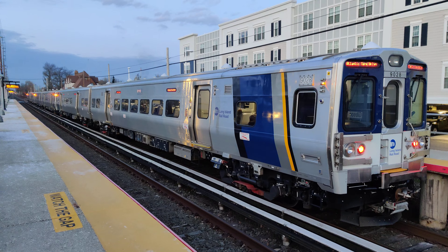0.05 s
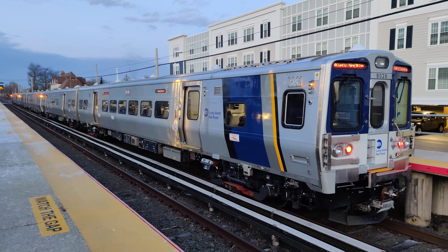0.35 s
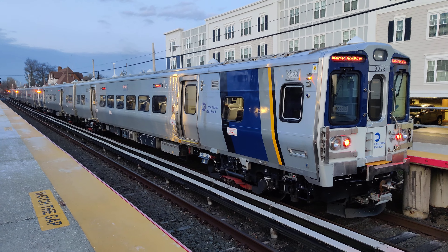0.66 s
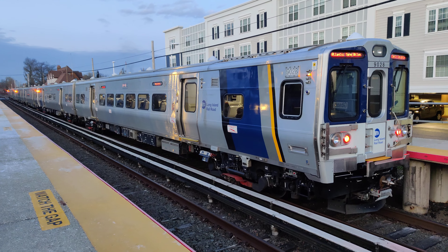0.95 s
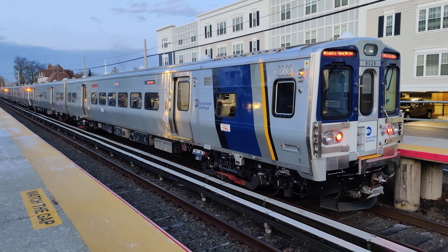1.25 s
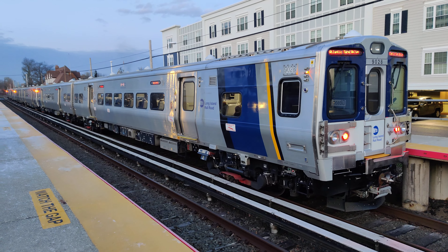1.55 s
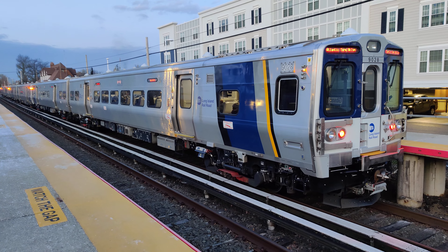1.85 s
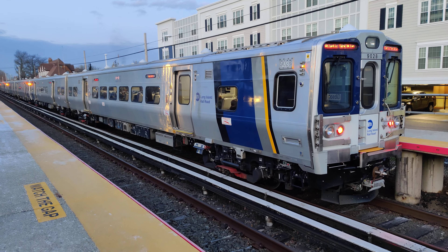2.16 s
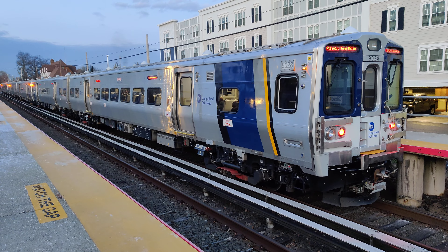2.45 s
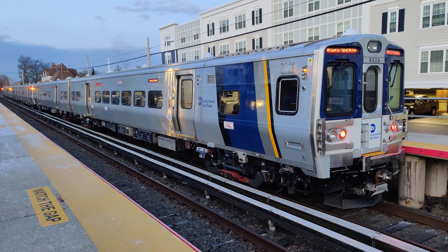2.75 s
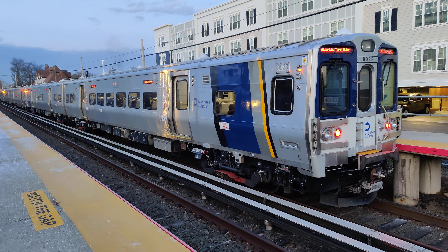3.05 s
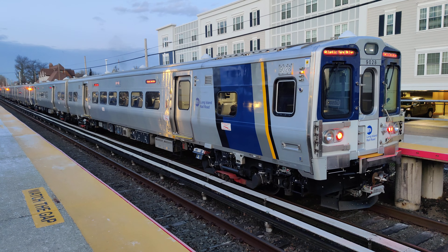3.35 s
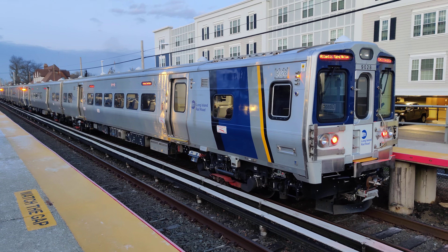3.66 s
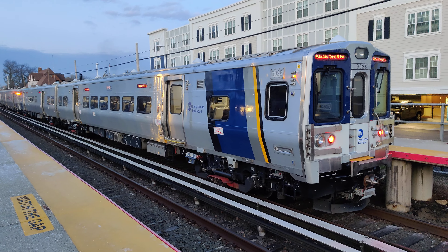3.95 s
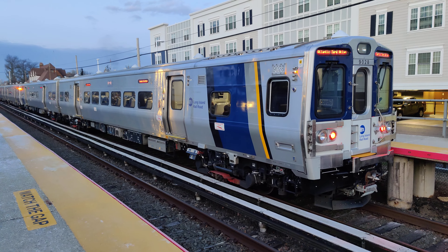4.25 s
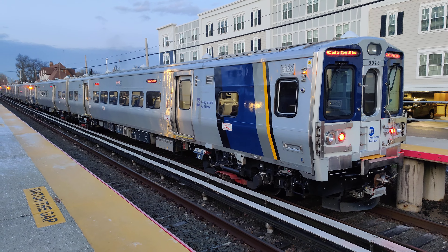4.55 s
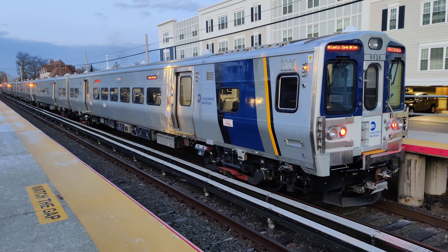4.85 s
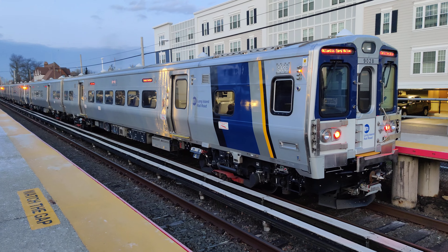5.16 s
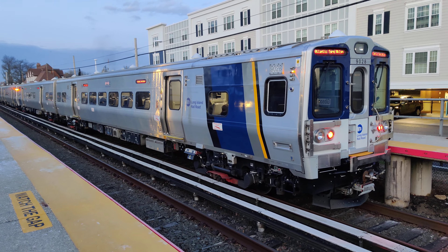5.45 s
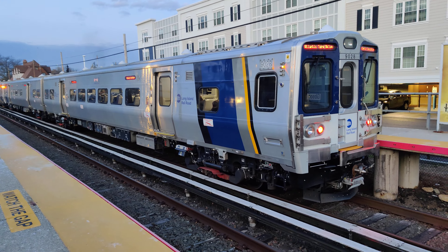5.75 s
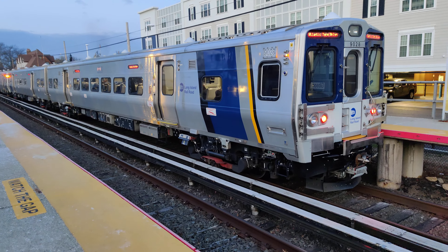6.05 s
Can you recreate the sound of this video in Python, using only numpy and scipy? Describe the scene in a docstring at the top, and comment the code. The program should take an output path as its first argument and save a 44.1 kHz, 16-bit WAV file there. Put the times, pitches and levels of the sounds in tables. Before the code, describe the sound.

Throbbing blower hum, airy hiss and thin high tones from a standing electric train, with close handling rubs and ticks near the end.

```python
"""An outdoor platform, where an electric commuter train idles: its blowers rumble and throb, air hisses,
the converters whistle faintly, and there is one dry click and a thin squeal. Further off, a faint motor
rises and falls. Late on, the hand that holds the camera shifts its grip: skin rubs over the case,
which ticks and knocks. Each microphone port adds its own resonances."""
import sys
import numpy as np
from scipy.fft import rfft, irfft, next_fast_len
from scipy.io import wavfile
from scipy.ndimage import map_coordinates

SR = 44100
rng = np.random.default_rng(int(sys.argv[2]) if len(sys.argv) > 2 else 0)


def dump(signal):
    """Clip the signal to [-1, 1] and save it as 16-bit WAV at the path in sys.argv[1]."""
    limited = np.clip(np.atleast_2d(signal).T, -1, 1)
    pcm = np.round(limited * 32767).astype(np.int16)
    wavfile.write(sys.argv[1], SR, pcm)


N = 269451


def amp(db):
    """Decibels to gain."""
    return 10 ** (np.asarray(db) / 20)


def unit(x):
    """Scale to rms 1."""
    return x / np.sqrt(np.mean(x ** 2) + 1e-20)


def along(points, hz):
    """Read (freq_hz, value) points on a log frequency axis."""
    freqs, values = np.transpose(points)
    return np.interp(np.log(hz + 1), np.log(freqs + 1), values)


def curves(rows):
    """Automation lanes: one value per sample for each column after time_s."""
    times, *columns = np.transpose(rows)
    return [np.interp(np.arange(N) / SR, times, column) for column in columns]


def wobble(rate):
    """A smooth random curve, rate knots a second."""
    return map_coordinates(rng.standard_normal(int(N * rate / SR) + 4), [np.arange(N) * rate / SR])


def filtered(x, response):
    """Filter x by a complex response of frequency."""
    size = next_fast_len(N + SR // 4)
    return irfft(rfft(x, size) * response(np.fft.rfftfreq(size, 1 / SR)), size)[..., :N]


def panned(pan_db):
    """Left and right gains for a level difference; positive is left."""
    return amp(np.array([[.5], [-.5]]) * pan_db)


def add(track, start_s, sound):
    """Mix a short sound into a track."""
    part = track[..., round(start_s * SR):][..., :sound.shape[-1]]
    part += sound[..., :part.shape[-1]]


def blend(pair, correlation):
    """Set the stereo width of two unrelated noises from (freq_hz, correlation) points."""
    angle = lambda hz: np.arccos(np.clip(along(correlation, hz), -1, 1)) / 2
    mid, side = filtered(pair, lambda hz: np.array([np.cos(angle(hz)), np.sin(angle(hz))]))
    return np.array([mid + side, mid - side])


def left_first(pair, lead):
    """Let the sound reach the left port a little earlier, by (freq_hz, lead_rad) points."""
    return filtered(pair, lambda hz: np.exp(1j * np.array([[.5], [-.5]]) * along(lead, hz)))


def port(x, resonances):
    """The resonant peaks and dips on the way into one microphone port, as a chain of bell filters."""
    def bell(hz, centre_hz, width_hz, gain_db):
        detune, damping = centre_hz ** 2 - hz ** 2, 1j * hz * width_hz
        return (detune + damping * amp(gain_db / 2)) / (detune + damping / amp(gain_db / 2))
    return filtered(x, lambda hz: np.prod([bell(hz, *band) for band in resonances], axis=0))


def motor(waver=0.008, flutter=.4, flutter_hz=14):
    """One slightly wavering tone that follows the speed of a distant motor."""
    # the motor speeds up and slows down: time_s, pitch_hz, level_db
    motor_run = [(0, 324.3, -61), (2.1, 335.2, -48), (2.75, 346, -41.5), (3.15, 359, -42), (3.45, 380, -47),
                 (4.0, 411.7, -47.5), (4.25, 413.4, -46), (4.55, 427, -47.5), (4.85, 432, -45.5),
                 (5.1, 385.3, -48.5), (5.3, 348, -42.5), (6.11, 324.3, -60)]
    hz, db = curves(motor_run)
    phase = 2 * np.pi * np.cumsum(hz * (1 + waver * wobble(14))) / SR
    return amp(db) * unit(1 + flutter * wobble(flutter_hz)) * np.sin(phase)


def whine(whine_hz=2280, width_hz=190, start_db=-63, fade_db_per_s=1):
    """A fuzzy, centred band of ringing around a cluster of converter tones, slowly fading."""
    band = lambda hz: 1 / (1 + (2 * (hz - whine_hz) / width_hz) ** 2)
    ringing = unit(filtered(rng.standard_normal(N), band))
    return amp(start_db - fade_db_per_s * np.arange(N) / SR) * ringing


def converters(flare_drift_rad=.7):
    """Steady switching tones; shifting echo paths make them fade, drift and now and then ring out."""
    # converter whistles: pitch_hz, level_db
    whistles = [(797, -64), (2215, -68), (2236, -66), (2314, -67.5), (2820, -77), (2855, -70), (3468, -75),
                (3510, -77), (4152, -78), (4936, -80), (5400, -73.5), (5520, -84), (7029, -78.5),
                (10680, -88), (10801, -84)]
    # tones that swell for a moment: peak_s, length_s, pitch_hz, peak_db
    flares = [(.75, .6, 2210, -59), (2.0, .55, 2217, -57), (2.82, .35, 2222, -58), (3.05, .9, 2314, -61),
              (3.4, .65, 804, -50), (3.92, .45, 2237, -54.5), (4.3, .8, 795, -50), (4.32, .6, 2230, -58),
              (4.449, .7, 2314, -60), (4.671, 0.177, 4933, -59.5), (5.509, .18, 4900, -59.5)]
    t, out = np.arange(N) / SR, np.zeros((2, N))
    for hz, db in whistles:
        for channel in out:
            phase = 2 * np.pi * (hz * t + rng.random()) + .55 * wobble(5)
            channel += amp(db + 2.2 * wobble(2)) * np.sqrt(2) * np.sin(phase)
    for peak_s, length_s, hz, db in flares:
        size = round(length_s * SR)
        tone = np.sin(2 * np.pi * hz * t + flare_drift_rad * np.array([wobble(20), wobble(20)]))
        add(out, peak_s - length_s / 2, amp(db) * np.hanning(size) * tone[:, :size])
    return out


def squeal(waver=0.016):
    """A thin, unsteady squeal of air that swells briefly out of the hiss."""
    # the upward glide: start_s, length_s, start_hz, end_hz, peak_db
    glide = (3.07, .38, 4580, 5170, -58.5)
    start_s, length_s, start_hz, end_hz, db = glide
    out, size = np.zeros((2, N)), round(length_s * SR)
    jitter = np.array([wobble(210), wobble(197)])[:, :size]
    hz = np.linspace(start_hz, end_hz, size) * (1 + waver * jitter)
    add(out, start_s, amp(db) * np.hanning(size) * np.sin(2 * np.pi * np.cumsum(hz, axis=1) / SR))
    return out


def snap(start_s=.2676, level_db=-24, pitch_hz=2350, ring_s=0.0006, pan_db=-6):
    """One small dry click from the train, on the right: a hard attack and a very short ring."""
    age = np.maximum(np.arange(N) / SR - start_s, 0)
    return amp(level_db) * np.exp(-age / ring_s) * np.sin(2 * np.pi * pitch_hz * age) * panned(pan_db)


def hand_effort(grip_s=4.70, grip_rise_s=0.046, rustle_db=-46.5, rustle_treble_db=-2, attack_s=0.013):
    """Envelopes of the dull rub and the bright rasp: strokes build fast and die away over a rustle."""
    # strokes of skin over the case: peak_s, peak_db, release_s, treble_db
    strokes = [(4.717, -33, 0.028, -1.5), (4.825, -40, 0.07, 0), (4.895, -41, 0.1, 2),
               (4.965, -40, 0.02, 1.5), (5.048, -39.5, .025, 2), (5.12, -39, .015, 3),
               (5.178, -32.3, 0.08, 2.5), (5.243, -38, 0.075, 5.3), (5.297, -40.5, .025, 3),
               (5.533, -37.5, .045, -3), (5.91, -39, 0.04, -1)]
    t = np.arange(N) / SR
    fade_in = np.clip(1 + (t - grip_s) / grip_rise_s, 0, 1)
    power = (amp([[rustle_db], [rustle_db + rustle_treble_db]]) * fade_in) ** 2
    for peak_s, db, release_s, treble_db in strokes:
        # attack and release are times per 10 dB
        stroke = amp(db - 10 * np.maximum((peak_s - t) / attack_s, (t - peak_s) / release_s))
        power += (stroke * amp([[0], [treble_db]])) ** 2
    return np.sqrt(power)


def rubbing(trim_db=-1, grain_db=2.4, clump_db=1, split_hz=2600):
    """Skin sticks and slips on the case in tiny, clumped bursts, with more body at the right port."""
    # spectrum of the rubbed case: freq_hz, gain_db
    case_colour = [(200, -21), (480, 7.5), (800, 4), (1200, 3), (1900, 2.5), (2600, -5.5), (3300, 0),
                   (4700, -3.5), (5600, -10.5), (7000, -12), (8000, -10.5), (11000, -17.5), (16000, -23)]
    # likeness of left and right for sound through the case: freq_hz, correlation
    case_correlation = [(500, 0.71), (1900, 0.84), (2600, .68), (5500, 0.5), (8000, 0.16)]
    # path through the case to the right port: centre_hz, width_hz, gain_db
    case_to_right = [(2160, 1700, 4.5), (3450, 960, -14), (5430, 900, 1), (7600, 1200, 3.5),
                     (9000, 1500, -4)]
    slips = amp(grain_db * wobble(600) + clump_db * wobble(150))
    friction = blend(slips * rng.standard_normal((2, N)), case_correlation)
    friction = unit(filtered(friction, lambda hz: amp(along(case_colour, hz))))
    dull = filtered(friction, lambda hz: 1 / (1 + (hz / split_hz) ** 4))
    rub, rasp = hand_effort()
    left, right = rub * dull + rasp * (friction - dull)
    return amp(trim_db) * np.array([left, port(right, case_to_right)])


def knocks(pan_db=-4, trim_db=-1.4, cutoff_hz=2400):
    """The hand damps the case, so a knock lasts a cycle or two; soft skin leaves out the treble."""
    # dull knocks of the case: centre_s, level_db, pitch_hz, ring_cycles
    hits = [(4.7160, -17, 1050, 0.58), (4.8030, -20.5, 1303, 0.41), (4.903, -21.5, 1450, 0.45),
            (4.952, -26, 1600, .7), (5.0526, -20.5, 920, 0.57), (5.1280, -22, 1460, 0.8),
            (5.1813, -20, 1000, 0.49), (5.189, -25, 900, .5), (5.295, -27, 1450, 0.72),
            (5.4236, -21.5, 1480, 0.65), (5.746, -26.5, 1600, .8), (5.8501, -22, 1400, 0.84),
            (6.0087, -17, 1630, 1), (6.051, -25, 1150, .7), (6.0750, -11.5, 1280, 0.47)]
    out, t = np.zeros(N), np.arange(-SR // 200, SR // 200) / SR
    for centre_s, db, hz, cycles in hits:
        envelope = amp(db + trim_db) * np.exp(-(t * hz / cycles) ** 2)
        add(out, centre_s + t[0], envelope * np.sin(2 * np.pi * hz * t))
    return filtered(out, lambda hz: 1 / np.sqrt(1 + (hz / cutoff_hz) ** 10)) * panned(pan_db)


def ticks(attack_s=0.00069, trim_db=-5.5, tilt_hz=6000):
    """Each sudden slip of skin is a crack of a few milliseconds, some brighter than others."""
    # slips of skin: start_s, level_db, pan_db, treble_tilt_db_per_octave
    slips = [(4.7145, -27, 3, 2), (4.7675, -27, 3, 1), (4.7815, -31, 2, 5), (4.8015, -22, 6, -4),
             (4.8184, -21, 3, -1), (4.838, -32, 3, -2), (4.8688, -31, 3, -2), (4.9013, -22.5, 7, -1.5),
             (4.931, -28, 5, -4), (4.950, -22.5, 6, -5), (4.957, -26, 6, -5), (4.972, -27, 6, -4),
             (5.0325, -35, 2, 6), (5.050, -24, 4, -1), (5.1262, -23, 1, -1), (5.1745, -16, 1, -6),
             (5.181, -21, 1, -8), (5.192, -18, -1, -5), (5.222, -25, 2, -3), (5.293, -26, 2, -1),
             (5.3527, -29, 1, 0), (5.5308, -32, -4, 2), (5.547, -28, -2, 1), (5.5615, -22.5, 3, -1),
             (5.659, -29, 2, 1), (5.7465, -24, 0, -6), (5.7778, -19, -1, 1), (5.837, -27, 4, -5),
             (5.9005, -21.5, 5, -3), (5.926, -27, 3, -6), (5.935, -27, 3, -6), (6.005, -23.5, -1, 5),
             (6.0738, -26, 0, -8)]
    # spectrum of a tick before its tilt: freq_hz, gain_db
    tick_colour = [(800, -18), (2000, -9), (3800, 0.5), (5200, -1), (7500, -5), (10000, -11.5),
                   (16000, -16)]
    out, age = np.zeros((2, N)), np.arange(SR // 50) / SR / attack_s
    hz = np.fft.rfftfreq(len(age), 1 / SR)
    for start_s, db, pan_db, tilt in slips:
        colour = amp(along(tick_colour, hz) + tilt * np.log2(.5 + hz / tilt_hz))
        crack = irfft(rfft(rng.standard_normal((2, len(age)))) * colour, len(age))
        envelope = amp(db + trim_db) * age * np.exp(1 - age)
        add(out, start_s, envelope * panned(pan_db) * crack)
    return out


def hand():
    """The grip shifts: rubs and knocks travel through the case, with bright ticks on top."""
    # phase lead of the left port through the case: freq_hz, lead_rad
    case_lead = [(500, .2), (1200, 0.6), (2000, 1.27), (2850, 2.5), (3500, 5.8), (4450, 8.6), (5100, 9.9)]
    return left_first(rubbing() + knocks(), case_lead) + ticks()


def outdoors(colour):
    """Coloured noise of rms 1: the bass is alike at both ports, the treble arrives from all sides."""
    # likeness of left and right in the open air: freq_hz, correlation
    air_correlation = [(25, 0.91), (80, 1), (160, 0.86), (300, .95), (400, 0.69), (520, 0.37), (750, 0.66),
                       (1200, 0.45), (1900, 0.4), (2450, 0.16), (3200, 0.27), (5000, 0.047)]
    # phase lead of the left port in the open air: freq_hz, lead_rad
    air_lead = [(300, 0), (560, 0.26), (850, 0.35), (1200, 1.5), (1600, 2), (2500, 2.5), (3300, 2.6)]
    noise = filtered(rng.standard_normal((2, N)), lambda hz: amp(along(colour, hz)))
    return unit(left_first(blend(noise, air_correlation), air_lead))


def drone(pitch_hz=87.5, wander=0.045, throb=.75, throb_hz=17, trim_db=-3):
    """The low note of the blowers swells slowly, throbs at random and wanders a little in pitch."""
    # slow swell of the blower note: time_s, level_db
    swell = [(0, -33.5), (.55, -39.5), (1.6, -30), (2.2, -29), (2.7, -26.5), (3.3, -32), (4.1, -25.5),
             (4.65, -34.5), (5.1, -29.5), (6.11, -38)]
    db, = curves(swell)
    phase = 2 * np.pi * np.cumsum(pitch_hz * (1 + wander * wobble(16))) / SR
    return amp(db + trim_db) * unit(1 + throb * wobble(throb_hz)) * np.sqrt(2) * np.sin(phase)


def blowers(rumble_db=-28.5, surge_db=.5, air_db=-41, flutter_db=.5):
    """The broad rumble of the ducts and the air that rushes out of them."""
    # spectrum of the duct rumble: freq_hz, gain_db
    rumble_colour = [(8, -20), (22, -7), (40, -0.5), (56, 1.5), (74, -5), (102, 0), (130, -5), (160, -8),
                     (185, -6), (203, -8), (260, -8.5), (355, -13), (460, -25.5), (800, -65)]
    # spectrum of the cooling air: freq_hz, gain_db
    air_colour = [(200, -7.5), (420, -3), (520, -1.5), (620, 1), (690, -1), (800, 1), (1250, -6),
                  (2000, -7.5), (3000, -16.5), (4200, -19.5), (7000, -24.5), (10500, -28.5), (13000, -37),
                  (16000, -70)]
    rumble, air = outdoors(rumble_colour), outdoors(air_colour)
    return amp(rumble_db + surge_db * wobble(4.16)) * rumble + amp(air_db + flutter_db * wobble(9)) * air


def scene():
    """The idling train, the far motor and the hand on the camera."""
    train = blowers() + drone() + converters() + whine() + squeal() + snap()
    return train + motor() + hand()


def record(dry):
    """The ports colour the sound, the right one anew whenever a finger moves; the very top is cut."""
    # resonances of the left port: centre_hz, width_hz, gain_db
    left_port = [(2540, 760, 5.5), (4240, 570, -7.2), (5065, 960, 16.5), (5980, 760, -4.5), (7100, 700, 1),
                 (8500, 730, -2.5)]
    # the right port as fingers move beside it: start_s, [(centre_hz, width_hz, gain_db)]
    right_port = [(0, [(1550, 600, 1.5), (2400, 650, -2.5), (3150, 900, 5.5), (4500, 800, -4.5),
                  (5700, 1100, 10.5), (7950, 1700, 5)]), (1.12, [(2600, 430, -2.5), (3400, 500, 4.5),
                  (5400, 900, 8), (7600, 1500, 7.5)]), (3.06, [(1900, 1400, 4), (3850, 950, -8),
                  (5550, 1450, 13), (6750, 700, 4), (7900, 1000, -2)]), (5.35, [(1900, 1400, 4),
                  (3850, 950, -9), (5550, 1450, 12), (7500, 1200, 2.5), (11300, 2000, -1.5)])]
    top_hz = 15900
    left, right = port(dry[0], left_port), port(dry[1], right_port[0][1])
    for start_s, resonances in right_port[1:]:
        crossfade, = curves([(start_s - .05, 0), (start_s + .05, 1)])
        right = (1 - crossfade) * right + crossfade * port(dry[1], resonances)
    return filtered(np.array([left, right]), lambda hz: hz < top_hz)


dry = scene()
out = record(dry)
dump(out)
```